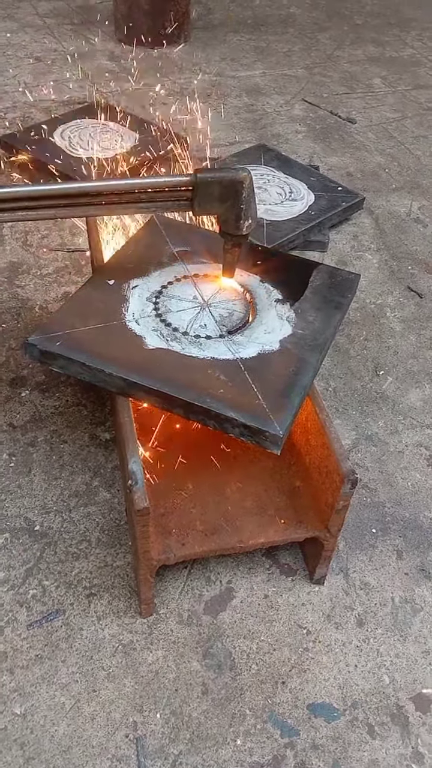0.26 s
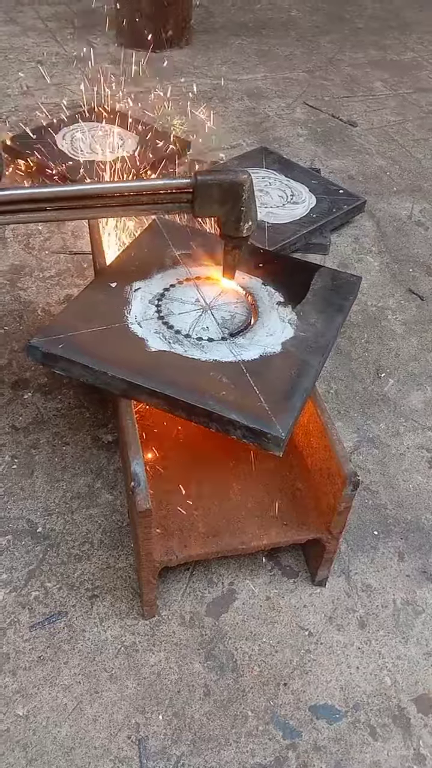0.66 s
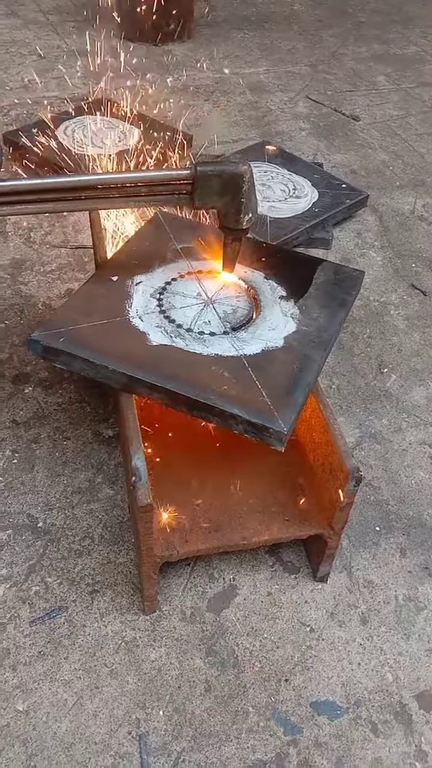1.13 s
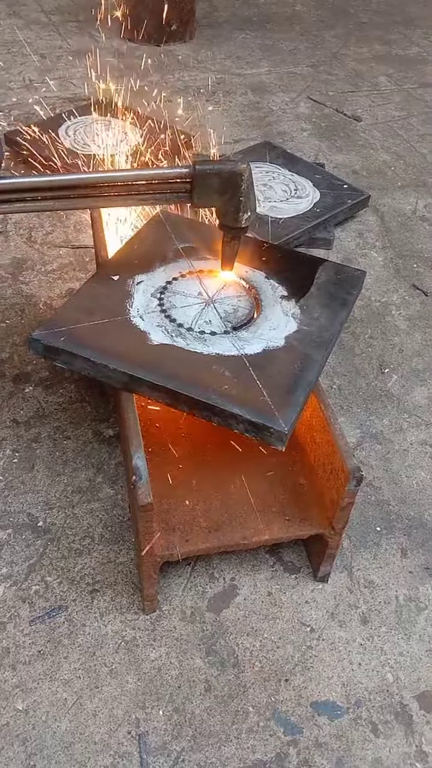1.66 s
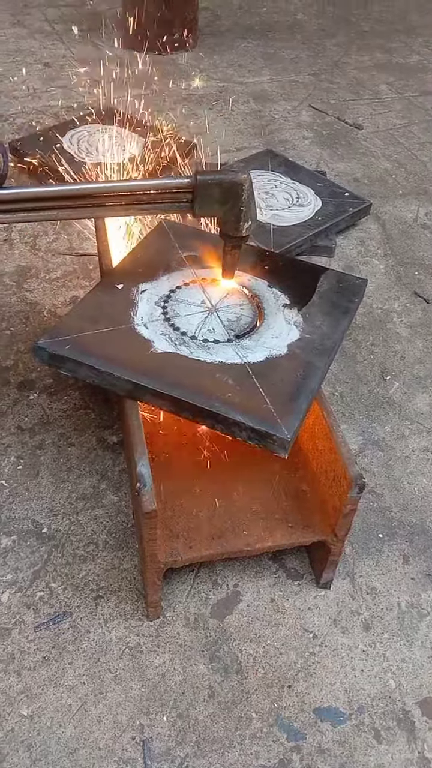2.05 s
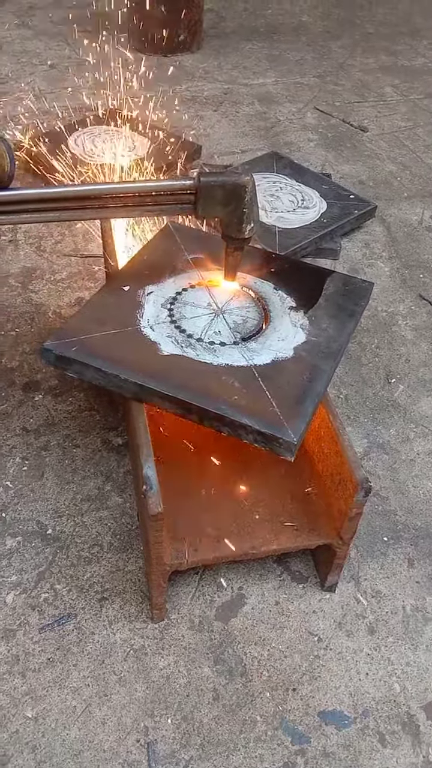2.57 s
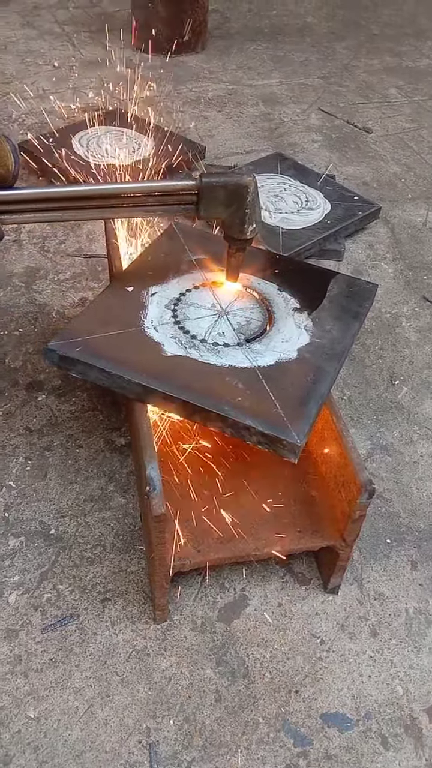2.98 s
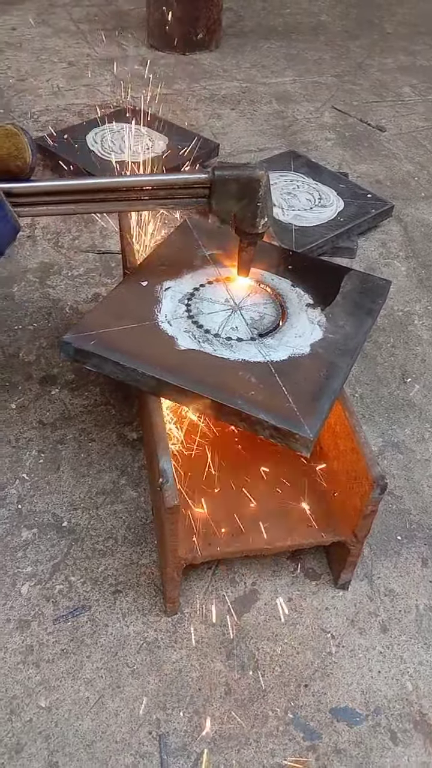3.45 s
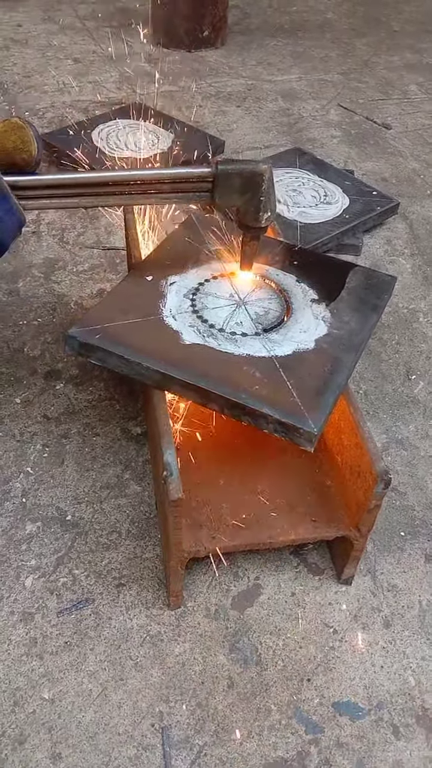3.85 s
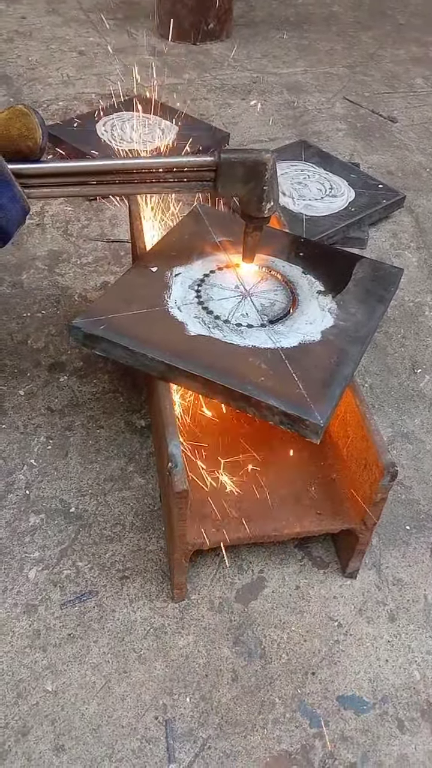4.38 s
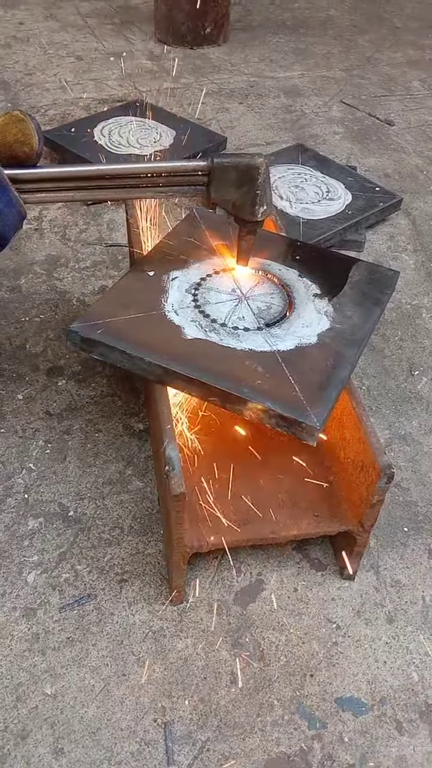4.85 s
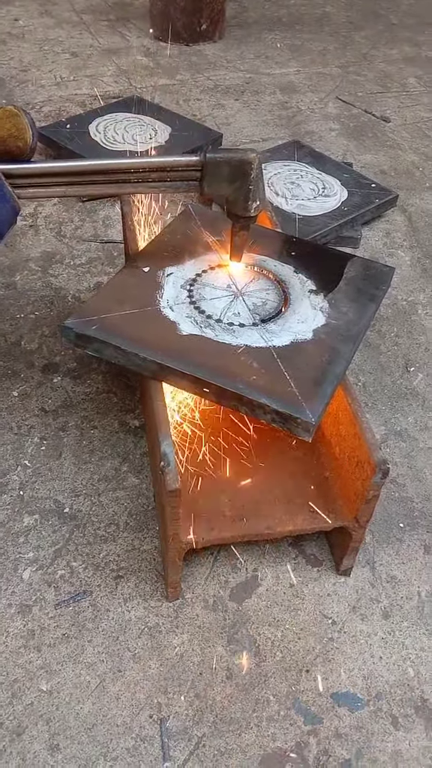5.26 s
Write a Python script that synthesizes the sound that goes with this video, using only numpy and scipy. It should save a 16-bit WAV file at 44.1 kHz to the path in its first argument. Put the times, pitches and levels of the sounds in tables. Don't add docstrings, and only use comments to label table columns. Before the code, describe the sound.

A torch is already cutting steel plate at 0 seconds and continues unbroken to the end, about 5.5 seconds. The dominant sound is a dense, bright jet hiss reaching very high, with broad noisy whistling resonances around 3.4, 5.3 and 7 kHz, breathy rather than pure tones. Until about 2.4 seconds it is full and fairly even, with small rapid flutter. Around 2.5 seconds the main band dips, a brief soft flame puff comes through, and the hiss changes colour; further dips near 3.2 and 4.3 seconds and small recoveries follow, with another colour change around 4.4. A quieter mid roar and uneven low wind-like flutter lie underneath, with a faint hollow hum from the steel channel fading gradually. Tiny crisp slag ticks pepper the treble in clumps. Outdoor concrete yard, close single microphone, practically mono, only very short reflections, no reverberant tail.

```python
import sys
import numpy as np
from scipy import signal
from scipy.fft import rfft, irfft
from scipy.io import wavfile

SR = 44100
rng = np.random.default_rng(int(sys.argv[2]) if len(sys.argv) > 2 else 0)


def dump_mix(stems):
    frames = np.atleast_2d(stems).T
    limited = np.clip(frames, -1, 1)
    pcm = np.round(limited * 32767).astype(np.int16)
    wavfile.write(sys.argv[1], SR, pcm)


def makeup_ratio(level_db):
    decades = np.asarray(level_db, float) / 20
    return 10 ** decades


N = 243412

# centre_s, half_length_s, deep_flutter_change_db
FLAME_GUSTS = [(.11, 0.031, 13), (.28, 0.1, -6), (.55, 0.073, 5), (.88, 0.14, 12), (1.17, .09, -4),
               (1.38, .06, 7), (1.62, 0.048, 14), (1.96, 0.061, 7), (2.27, .05, -1), (2.52, 0.083, 14),
               (2.85, 0.18, 7.5), (3.02, 0.036, 3), (3.22, 0.04, 4), (3.37, .04, 5), (3.58, 0.095, 11.5),
               (3.8, .05, -7), (3.97, 0.076, 12), (4.12, .04, 5), (4.3, 0.036, 4), (4.45, 0.037, 10),
               (4.64, 0.056, 10), (4.85, 0.071, -1), (5.05, 0.081, 6), (5.27, .05, 6), (5.48, 0.042, 7)]
# centre_s, half_length_s, low_resonance_change_db, nozzle_edge_change_db
CUT_FALTERS = [(.07, 0.073, -3, 8), (.24, .07, 2.5, -7), (.45, 0.054, -1.5, 2.5), (.7, 0.034, 1.5, .1),
               (2.42, .1, -3.5, 3), (3.07, .1, 1.5, 5.5), (3.85, 0.043, -1.5, 2), (4.4, 0.073, -1, 2),
               (4.97, .06, 3, 3), (5.13, 0.044, -1, -10), (5.27, .05, 2.5, 1)]


def rms_one(x):
    return x / np.sqrt(np.mean(x ** 2) + 1e-20)


def steep(x, hz, kind):
    return signal.sosfilt(signal.butter(6, hz, kind, fs=SR, output="sos"), x)


def third_order_band(x, low_hz, high_hz):
    return signal.sosfilt(signal.butter(3, [low_hz, high_hz], "band", fs=SR, output="sos"), x)


def in_time(rows):
    s, value = np.transpose(rows)
    return np.interp(np.arange(N) / SR, s, value)


def bell(centre_s, half_length_s):
    return np.exp(-((np.arange(N) / SR - centre_s) / half_length_s) ** 2)


def swells(rows, column):
    return sum(row[column] * bell(row[0], row[1]) for row in rows)


def drift(rate_hz):
    coarse = 40
    pole = np.exp(-2 * np.pi * rate_hz * coarse / SR)
    noise = rng.standard_normal(N // coarse + 2002)
    slow = signal.lfilter([1], [1, -2 * pole, pole * pole], noise)[2000:]
    return np.interp(np.arange(N) / coarse, np.arange(len(slow)), rms_one(slow - slow.mean()))


def follows(mean, per_main_db, per_upper_db):
    # time_s, drive_db
    main_drive = [(0.0, -19), (0.18, -18), (0.38, -21), (0.94, -19), (2.18, -20), (2.51, -26), (2.61, -22),
                  (3.17, -27), (3.47, -23), (4.03, -24), (4.07, -21), (4.3, -27), (4.33, -24), (4.95, -21),
                  (5.0, -24), (5.09, -20), (5.18, -26), (5.52, -24)]
    # time_s, drive_db
    upper_drive = [(0.0, -30), (1.51, -26), (1.64, -30), (2.08, -27), (2.41, -33), (2.47, -26), (2.54, -31),
                   (2.87, -25), (3.53, -28), (3.57, -32), (3.7, -28), (4.35, -25), (4.5, -32), (4.55, -27),
                   (4.58, -32), (4.78, -31), (4.8, -29), (5.52, -29)]
    main, upper = in_time(main_drive), in_time(upper_drive)
    return mean + per_main_db * (main - main.mean()) + per_upper_db * (upper - upper.mean())


def blown(hz, core_hz, skirt_hz, flutter_db):
    swing = rng.standard_normal(N) + 1j * rng.standard_normal(N)
    for width_hz in (core_hz, skirt_hz):
        swing = signal.lfilter([1], [1, -np.exp(-np.pi * width_hz / SR)], swing)
    phase = np.cumsum(2 * np.pi * hz / SR * np.ones(N))
    flutter = makeup_ratio(flutter_db * (drift(20.5) + 0.24 * drift(80)))
    return rms_one(flutter * np.real(swing * np.exp(1j * phase)))


def banded_noise(spectra, span_hz, count, shared_db, own_db, rate_hz, place=0):
    band_edges = np.geomspace(*span_hz, count + 1)
    white = rng.standard_normal((2, N))
    together = drift(rate_hz)
    out = 0
    for k, (low, high) in enumerate(zip(band_edges, band_edges[1:])):
        band = third_order_band(white[k % 2], low, high)
        log_centre = np.log(low * high) / 2
        levels = []
        for spectrum in spectra:
            point_hz, point_db = np.transpose(spectrum)
            levels.append(np.interp(log_centre, np.log(point_hz), point_db))
        colour_db = np.interp(place, np.arange(len(spectra)), levels)
        out = out + makeup_ratio(colour_db + shared_db * together + own_db * drift(rate_hz)) * band
    return rms_one(out)


def channel_hum():
    # pitch_hz, width_hz, level_db
    air_modes = [(687, 26, -50.5), (816, 8.7, -53.5), (1130, 17, -75), (1954, 180, -44), (2570, 330, -41.5)]
    # time_s, level_db
    flame_reach = [
        (0, 2),
        (1.3, 1.5),
        (2.4, -3),
        (5.52, -6),
    ]
    hum = sum(makeup_ratio(db) * blown(hz, width, 4 * width, 0.91) for hz, width, db in air_modes)
    return makeup_ratio(in_time(flame_reach)) * steep(hum, 450, "high")


def flare_ups():
    # centre_s, half_length_s, level_db
    puffs = [
        (2.508, 0.021, -31.5),
        (2.85, 0.054, -42),
        (3.245, .006, -37),
        (3.7, 0.029, -46),
        (4.8, 0.014, -51),
    ]
    swell = sum(makeup_ratio(db) * bell(s, half_s) for s, half_s, db in puffs)
    return swell * rms_one(steep(rng.standard_normal(N), (170, 1850), "band"))


def flame():
    # pitch_hz, density_db_per_hz
    deep_colour = [(12, -48), (20, -13), (32, -25), (87, -1), (194, -0.5), (290, 3.5), (380, -37.5),
                   (640, -120)]
    flutter_colour = [(160, -33), (270, -2), (360, -4.5), (443, -2.5), (600, -2.5), (780, -31),
                      (1320, -120)]
    roar_colour = [(330, -39), (560, -14.5), (682, -3.5), (853, -4.5), (1100, -3.5), (1640, -3.5),
                   (1820, -1.5), (2300, -4), (2880, -3.5), (3000, -2.5), (3900, -30), (6600, -120)]
    gust_db = swells(FLAME_GUSTS, column=2)
    deep = banded_noise([deep_colour], (22, 290), count=7, shared_db=1.7, own_db=4.0, rate_hz=16.0)
    flutter = banded_noise([flutter_colour], (270, 600), count=3, shared_db=-0.7, own_db=2.0, rate_hz=6.7)
    flutter = steep(flutter, 222, "high")
    roar = banded_noise([roar_colour], (560, 3050), count=10, shared_db=0.57, own_db=1.2, rate_hz=48.0)
    roar = steep(roar, 508, "high")
    burning = makeup_ratio(follows(-58.5, -0.6, 0.05) + gust_db) * deep
    burning += makeup_ratio(follows(-49, -0.3, 0.061) + 0.25 * gust_db) * flutter
    burning += makeup_ratio(follows(-34.5, 0.075, 0.068) + 0.03 * gust_db) * roar
    return burning


def slag():
    spits_per_s, level_db = 400, -44
    born = rng.random(N) < spits_per_s * makeup_ratio(5 * drift(7)) / SR
    sizes = makeup_ratio(1.2 * np.minimum(rng.exponential(1, N), 4)) * rng.choice([-1, 1], N)
    tick = signal.butter(2, [10500, 15000], "band", fs=SR, output="sos")
    return makeup_ratio(level_db) * rms_one(signal.sosfilt(tick, born * sizes + 1e-18))


def jet():
    # time_s, place (0-3)
    travel = [(0, 0.11), (2.15, 0.078), (2.35, 0.85), (3.2, 1.1), (3.45, 1.95), (4.33, 2.05), (4.5, 3.15),
              (5.52, 2.85)]
    # pitch_hz, density_db_per_hz
    hiss_colours = [
        [(4290, -29), (7300, 0.5), (8050, -13.5), (8740, -7.5), (10600, -13), (11400, -14.5), (12100, -8),
         (13600, -6), (14800, -4.5)],
        [(4290, -37), (7300, -6), (7610, -12), (8240, -7), (9390, -11), (10900, -12.5), (12100, -6),
         (13700, -6), (14800, 1)],
        [(4290, -30), (7300, -1), (8100, -11.5), (8770, -9.5), (9090, -17), (10300, -11), (11700, -11.5),
         (12700, -6), (14800, -3.5)],
        [(4290, -33), (7300, -7), (7880, -3), (8560, -9.5), (9840, -9), (11800, -12), (12500, -8), (13300, -9),
         (14800, -2)],
    ]
    # pitch_hz, density_db_per_hz
    between_colours = [
        [(3100, -13), (3900, 1.5), (4300, 2.5), (5200, -7), (6100, 8), (6500, 5), (7200, -15)],
        [(3100, 1), (3900, -0.5), (4300, 2), (5200, 1), (6100, -8), (6500, 3), (7200, 1.5)],
        [(3100, -4), (3900, 0.5), (4300, 1.5), (5200, 4), (6100, -2), (6500, 1), (7200, -1)],
        [(3100, -1), (3900, 1.5), (4300, -6), (5200, 2), (6100, 4), (6500, 5), (7200, -2)],
    ]
    place = in_time(travel)
    hiss = banded_noise(hiss_colours, (7000, 15800), count=28, shared_db=0.67, own_db=2.05,
                        rate_hz=16.6, place=place)
    between = banded_noise(between_colours, (3100, 7200), count=12, shared_db=1.0, own_db=1.76,
                           rate_hz=14.4, place=place)
    edge = steep(blown(15540, core_hz=900, skirt_hz=2300, flutter_db=1.6), 10000, "high")
    edge = edge * makeup_ratio(0.8 * drift(14.0))
    edge_db = follows(-25, -0.45, 0.05) + swells(CUT_FALTERS, column=3)
    return makeup_ratio(follows(-24, -0.046, 0.17)) * hiss + makeup_ratio(-26.5) * between + makeup_ratio(edge_db) * edge


def kerf():
    # core_width_hz, skirt_width_hz, flutter_db
    slot_shapes = [
        (306, 1060, 0.26),
        (255, 2300, 1),
        (386, 1800, 1),
    ]
    low_shape, core_shape, upper_shape = slot_shapes
    low = blown(follows(3413, 6.0, -8.0), *low_shape)
    core = blown(follows(5310, 6.0, -1.53), *core_shape)
    upper = blown(follows(6950, 18.0, -25.0), *upper_shape)
    wide = rms_one(third_order_band(rng.standard_normal(N), 4633, 5920))
    wide = wide * makeup_ratio(0.5 * drift(28) + 1.14 * drift(66))
    slot = makeup_ratio(follows(-28.5, 0.41, 0.47) + swells(CUT_FALTERS, column=2)) * low
    slot += makeup_ratio(follows(-24, 0.87, 0.01)) * wide
    slot += makeup_ratio(follows(-26, 1.36, 0.01)) * core
    slot += makeup_ratio(follows(-28, 0.01, 1.35)) * upper
    return steep(slot, (2944, 8470), "band")


def scene():
    # lag_ms, sway_ms, level_db
    reflections = [
        (1.702, 0.12, -21.5),
        (3.1, 0.13, -25),
        (5.3, 0.211, -20.5),
    ]
    direct = channel_hum() + flare_ups() + flame() + slag() + jet() + kerf()
    now = np.arange(N)
    echoes = 0
    for lag_ms, sway_ms, db in reflections:
        delay = (lag_ms + sway_ms * drift(0.322)) * SR / 1000
        echoes = echoes + makeup_ratio(db) * np.interp(now - delay, now, direct)
    return np.tile(makeup_ratio(-0.15) * (direct + echoes), (2, 1))


def roll_off(x):
    return signal.sosfilt(signal.butter(12, 16870, fs=SR, output="sos"), x)


def record(dry):
    # block_number, low_hz, high_hz
    split_bands = [(18, 12400, 13780), (38, 11710, 13780), (40, 5060, 6370), (40, 13090, 14470),
                   (42, 11710, 14470), (84, 9650, 11020), (126, 9650, 11020), (142, 6200, 7620),
                   (142, 13090, 14470), (150, 13090, 14470), (153, 6290, 7580), (153, 11710, 13090),
                   (173, 4180, 5250), (173, 8270, 10290), (188, 5640, 6980), (197, 13090, 14470),
                   (201, 6890, 8960), (201, 12400, 13780), (220, 4220, 5680)]
    block, first_start, split_db = 1024, 910, -2.0
    top_cut = signal.ellip(16, 0.3, 110, 15470, fs=SR, output="sos")
    mono = signal.sosfilt(top_cut, dry[0])
    window = signal.windows.kaiser_bessel_derived(2 * block, 4 * np.pi)
    bins_hz = np.arange(block + 1) * SR / (2 * block)
    apart = np.zeros(N)
    for number, low, high in split_bands:
        at = first_start + (number - 1) * block
        earlier = mono[at - 3 * block:at - block]
        other = rfft(earlier) * ((bins_hz > low) & (bins_hz < high))
        apart[at:at + 2 * block] += makeup_ratio(split_db) * window * irfft(other)
    return roll_off(mono + apart * [[1], [-1]])


dry = scene()
out = record(dry)
dump_mix(out)
```